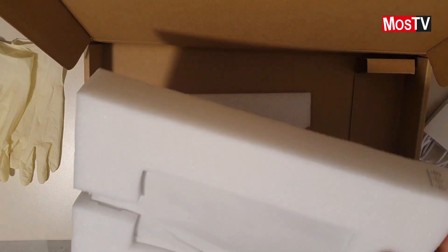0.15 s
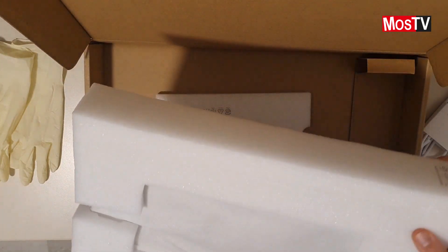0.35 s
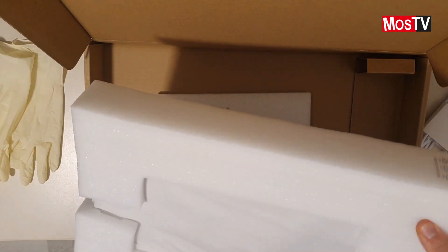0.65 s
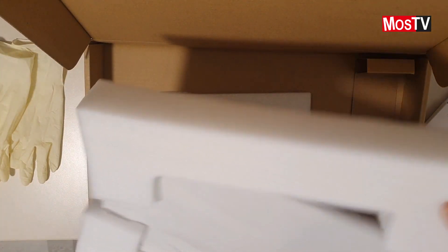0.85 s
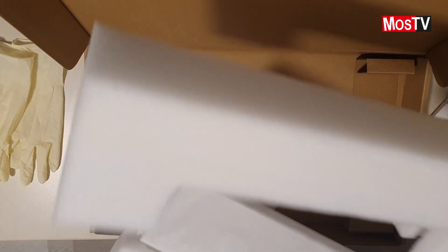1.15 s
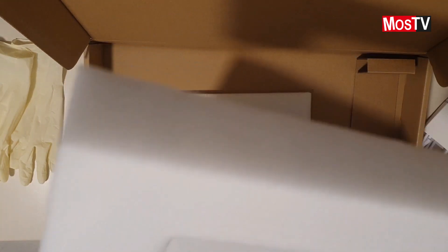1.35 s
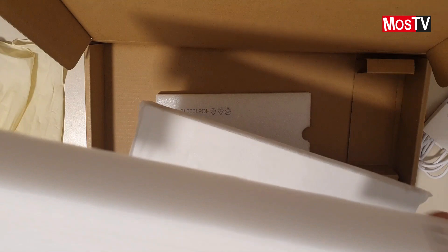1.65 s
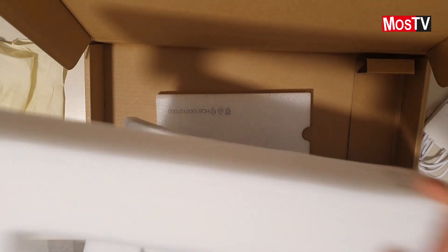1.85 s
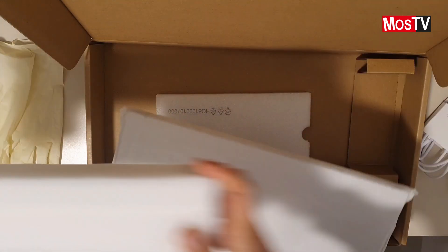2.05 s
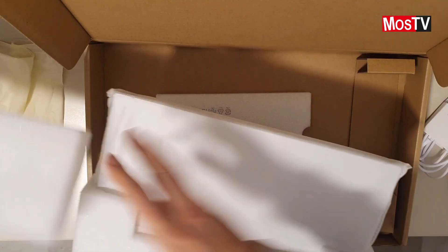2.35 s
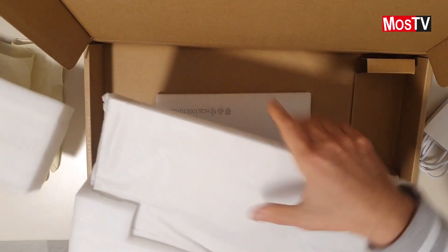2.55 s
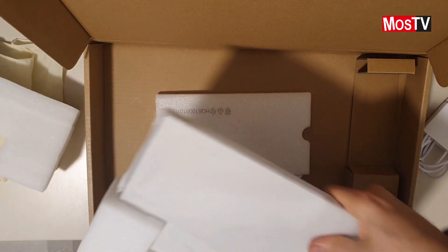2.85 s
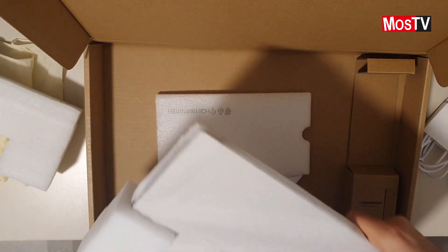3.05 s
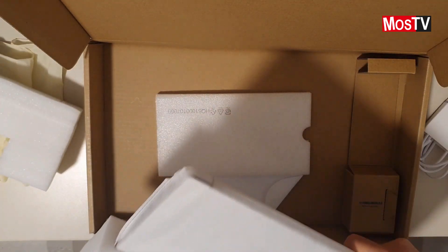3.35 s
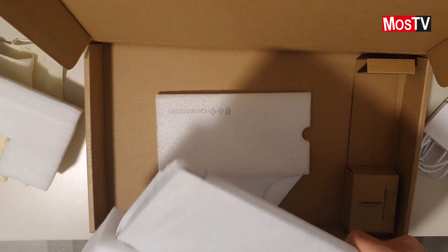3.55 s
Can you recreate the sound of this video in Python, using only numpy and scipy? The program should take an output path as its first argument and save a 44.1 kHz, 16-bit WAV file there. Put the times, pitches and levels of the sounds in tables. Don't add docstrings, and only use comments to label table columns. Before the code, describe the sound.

Foam rasps on cardboard from the start, swelling to its loudest near 0.4 s, easing at 0.6, then a brighter quick pull at 0.8-0.9. A soft dull slide fades around 1.0-1.3, leaving near quiet. Fingers brush lightly at 2.2; at 2.4 the block lands with a sharp woody thump and low table boom. Small bounces follow until 3.0, with faint wrap rustles, clearer at 3.45 and 3.7, over quiet room hum.

```python
import sys
import numpy as np
from scipy import signal
from scipy.fft import rfft, irfft, next_fast_len
from scipy.io import wavfile
from scipy.ndimage import uniform_filter1d, map_coordinates

SR = 44100
rng = np.random.default_rng(int(sys.argv[2]) if len(sys.argv) > 2 else 0)


def master_out(mix):
    frames = np.transpose(np.atleast_2d(mix))
    ceiling = np.clip(frames, -1, 1)
    pcm = np.round(ceiling * 32767).astype(np.int16)
    wavfile.write(sys.argv[1], SR, pcm)


def voltage_ratio(decibels):
    exponent = np.asarray(decibels, float) / 20
    return 10 ** exponent


N = 163170

# (frequency [Hz], density [dB per Hz])
RUB_COLOUR = [(410, -31.5), (700, -10), (921, 4), (1010, 0), (4400, -5.5), (6770, -12), (8020, -16.5),
              (11100, -18), (15800, -21.5)]


def unit(x):
    return x / np.sqrt(np.mean(x ** 2) + 1e-20)


def along(points, hz):
    f, v = np.transpose(points)
    return np.interp(np.log(hz + 1), np.log(f + 1), v)


def wobble(rate):
    return map_coordinates(rng.standard_normal(400), [np.arange(N) * min(rate, 90) / SR])


def filtered(x, response):
    m = next_fast_len(x.shape[-1] + 8192)
    spectrum = rfft(x, m) * response(np.fft.rfftfreq(m, 1 / SR))
    return irfft(spectrum, m)[..., :x.shape[-1]]


def closed(points, hz):
    (low_hz, low_db), (high_hz, high_db) = points[0], points[-1]
    return voltage_ratio(along([(low_hz / 3, low_db - 40)] + list(points) + [(high_hz * 2, high_db - 40)], hz))


def spread(pair, gain):
    # (frequency [Hz], correlation [-1 to 1])
    likeness = [(60, 0.67), (300, .86), (640, .6), (1400, -0.013), (3100, -0.047), (7000, 0.083)]

    def mid_side(hz):
        turn = np.arccos(np.clip(along(likeness, hz), -1, 1)) / 2
        return gain(hz) * np.array([np.cos(turn), np.sin(turn)])

    mid, side = filtered(pair, mid_side)
    return unit(np.array([mid + side, mid - side]))


def patchy(pair, patchy_db):
    z = signal.stft(pair, nperseg=512)[2]
    field = uniform_filter1d(rng.standard_normal(z.shape[1:]), size=3, axis=0)
    field = uniform_filter1d(field, size=5, axis=1)
    return signal.istft(z * voltage_ratio(patchy_db * unit(field)), nperseg=512)[1][:, :N]


def slips():
    slips_per_s, slip_db, smooth = 5000, 3, 1.35
    when, size = rng.random((2, N)), rng.exponential(size=(2, N))
    hiss = rng.standard_normal((2, N))
    jerks = (when < slips_per_s / SR) * np.sign(hiss) * voltage_ratio(slip_db * np.minimum(size, 4))
    return unit(jerks) + smooth * hiss


def panels(hz):
    # (centre [Hz], width [Hz], lift or, if negative, cut [dB])
    resonances = [(937, 300, -3.5), (1330, 150, 0.5), (2470, 61, 0), (6600, 1300, 3)]
    return voltage_ratio(sum(db / (1 + (2 * (hz - c) / w) ** 2) for c, w, db in resonances))


def strokes(rows, colour, patchy_db):
    # (frequency [Hz], density [dB per Hz])
    thrum = [(120, -14), (210, -16), (380, -4), (575, -7), (920, -6), (1150, -12.5)]
    edge_db, body_db = 24, -9.5
    t, rasp, body = np.arange(N) / SR, np.zeros(N), np.zeros(N)
    for s, rise, fall, db, low_db in rows:
        from_peak = (t - s) / np.where(t < s, rise, fall)
        press = voltage_ratio(2 * (db - edge_db * from_peak ** 2))
        rasp += press
        body += press * voltage_ratio(2 * (low_db + body_db))
    high = spread(patchy(slips(), patchy_db), lambda hz: closed(colour, hz) * panels(hz))
    low = spread(patchy(slips(), patchy_db), lambda hz: closed(thrum, hz))
    high = voltage_ratio(0.5 * wobble(35.9)) * np.sqrt(rasp) * high
    return high + voltage_ratio(0.59 * wobble(45)) * np.sqrt(body) * low


def room_tone():
    # (frequency [Hz], density [dB per Hz])
    hush_colour = [(150, -5.5), (330, -20), (700, -23), (1080, -9.5), (1330, -19.5), (2500, -27.5),
                   (6500, -30.5), (13000, -39)]
    # (frequency [Hz], density [dB per Hz])
    drone_colour = [(30, -21.5), (48, 0), (65, -11.5), (90, -5.5), (120, -21), (250, -28)]
    hush_db, hush_top_hz, drone_db = -74, 12800, -67.5
    hush = patchy(rng.standard_normal((2, N)), 1.5)
    hush = spread(hush, lambda hz: closed(hush_colour, hz) * (hz < hush_top_hz))
    drone = spread(rng.standard_normal((2, N)), lambda hz: closed(drone_colour, hz))
    return voltage_ratio(hush_db) * hush + voltage_ratio(drone_db + 0.7 * wobble(5)) * drone


def cardboard_rubs():
    # (time of peak [s], rise [s], fall [s], level [dB], low body [dB])
    rubs = [
        (0.0, .05, 0.15, -48.5, -2.5),
        (.14, 0.082, 0.31, -36, 1.5),
        (.21, 0.15, 0.078, -31, -6.5),
        (.37, 0.1, 0.081, -27, -4.5),
        (.61, 0.086, 0.095, -52, 8),
    ]
    return strokes(rubs, RUB_COLOUR, patchy_db=1.36)


def table():
    # (time [s], level [dB], mode [Hz], t60 [s])
    shoves = [(0.091, -45.5, 100, 0.66), (.2, -44, 49.7, 0.29), (0.328, -56, 90, 0.39),
              (0.591, -57.5, 92.8, .3), (0.779, -47.5, 80, 0.37), (0.901, -50, 51.4, 0.81),
              (1.131, -45.5, 92.3, 0.36), (2.15, -55.5, 50.8, 0.84), (2.238, -40.5, 77.6, 0.13),
              (2.319, -48, 88.5, 0.23), (2.409, -23, 121, 0.13), (2.75, -35.5, 148, 0.1),
              (2.761, -37, 88.5, 0.57), (2.6, -48.5, 48.2, 1.2), (2.426, -31, 61, 0.49),
              (2.535, -35, 230, 0.11), (2.17, -60, 119, .2), (1.33, -63.5, 200, 0.22),
              (2.868, -41.5, 88.7, .5), (3.021, -44, 90.2, 0.29), (3.08, -47.5, 89.3, 0.53),
              (3.58, -54, 92, 0.4)]
    # (mode [Hz], level [dB], t60 [s], phase [rad])
    boom_modes = [(89.5, -1.5, .5, np.pi), (104.5, 0, .42, 0)]
    thump_s, thump_db, shove_s, lag = 2.4478, -20.5, 0.008, 20
    out, t = np.zeros(N + SR), np.arange(SR // 2) / SR
    soft = 1 - np.exp(-t / shove_s)
    for s, db, hz, t60 in shoves:
        out[round(s * SR):][:len(t)] += soft * voltage_ratio(db - 60 * t / t60) * np.sin(2 * np.pi * hz * t)
    boom = sum(voltage_ratio(db - 60 * t / t60) * np.sin(2 * np.pi * hz * t + phase) for hz, db, t60, phase in boom_modes)
    out[round(thump_s * SR):][:len(t)] += voltage_ratio(thump_db) * soft * boom
    return np.array([out[:N], np.roll(out, lag)[:N]]) * voltage_ratio([[-0.6], [0.6]])


def pull_out():
    # (time of peak [s], rise [s], fall [s], level [dB], low body [dB])
    pulls = [
        (.775, 0.041, 0.027, -36, 1),
        (.81, 0.063, 0.08, -26, -6.5),
        (.89, 0.099, 0.073, -27.5, 1.5),
    ]
    tilt_db = 1
    brighter = [(hz, db + tilt_db * np.log2(hz / 2000)) for hz, db in RUB_COLOUR]
    return strokes(pulls, brighter, patchy_db=1.4)


def foam_slides():
    # (time of peak [s], rise [s], fall [s], level [dB], low body [dB])
    slides = [
        (1.15, 0.27, 0.16, -53, 6),
        (1.26, 0.13, 0.027, -64, -7),
        (1.4, 0.45, 0.19, -74.5, -9),
        (1.51, 0.17, 0.079, -70, 3),
        (1.72, 0.03, 0.062, -76.5, 8),
        (1.8, 0.052, 0.066, -70, -8),
        (1.92, 0.029, 0.056, -80, 2.5),
    ]
    # (frequency [Hz], density [dB per Hz])
    slide_colour = [(1200, -20), (1950, -18.5), (2600, -13), (2950, -9.5), (3400, -10), (5300, -14.5),
                    (8400, -25), (12500, -28)]
    return strokes(slides, slide_colour, patchy_db=-1.2)


def hollows():
    # (start [s], end [s], from [Hz], to [Hz], level [dB])
    glides = [(1.02, 1.245, 400, 390, -62.5), (1.03, 1.24, 2700, 3100, -60),
              (1.18, 1.31, 3300, 3600, -67.5), (1.28, 1.56, 3500, 4000, -76), (2.12, 2.21, 1300, 1200, -66),
              (2.24, 2.325, 1250, 1080, -58.5), (2.33, 2.37, 900, 950, -70), (2.32, 2.36, 430, 380, -68.5),
              (2.36, 2.41, 3100, 2650, -73), (1.76, 1.84, 3300, 3800, -73), (3.42, 3.49, 730, 900, -57.5),
              (3.65, 3.697, 900, 950, -51.5), (3.66, 3.695, 2000, 2700, -57), (2.32, 2.36, 4900, 4900, -74)]
    q, tone, tone_top_hz = 8, 0.7, 1500
    out = np.zeros((2, N + SR))
    for s, end, from_hz, to_hz, db in glides:
        u = np.linspace(0, 1, round((end - s) * SR))
        slow = filtered(rng.standard_normal((2, 2, SR // 2)), lambda hz: 1 / (1 + (2 * q * hz / from_hz) ** 2))
        slow = slow[..., :len(u)]
        turn = 2 * np.pi * np.cumsum(from_hz + (to_hz - from_hz) * u) / SR
        steady = tone * (from_hz < tone_top_hz)
        song = unit((unit(slow[0]) + steady) * np.cos(turn) + unit(slow[1]) * np.sin(turn))
        swell = np.sqrt(np.sin(np.pi * u).clip(0))
        out[:, round(s * SR):][:, :len(u)] += voltage_ratio(db) * swell * song
    return out[:, :N]


def finger_brushes():
    # (time of peak [s], rise [s], fall [s], level [dB], low body [dB])
    brushes = [
        (2.17, 0.047, 0.055, -55, -0.5),
        (2.243, 0.0071, 0.071, -48.5, -9.5),
        (2.29, 0.044, 0.06, -57.5, -12),
    ]
    # (frequency [Hz], density [dB per Hz])
    brush_colour = [(600, -18.5), (1150, -0.5), (1500, -5), (4200, -5), (7000, -13.5), (15800, -20)]
    return strokes(brushes, brush_colour, patchy_db=1.5)


def ticks():
    # (time [s], level [dB], pan to the left [dB])
    cracks = [
        (2.2405, -52, 3),
        (2.409, -48, 3),
        (2.423, -26.5, 4.5),
        (2.4305, -36, 4),
        (2.7495, -52, 3),
        (2.7992, -53, 0),
        (2.966, -56, 0),
    ]
    # (frequency [Hz], density [dB])
    crack_colour = [(1500, -3), (3000, 0.5), (7000, -1), (11000, -5), (15000, -12)]
    t60_s = 0.011
    out, t = np.zeros((2, N + SR)), np.arange(SR // 40) / SR
    for s, db, pan_db in cracks:
        crack = spread(rng.standard_normal((2, len(t))), lambda hz: closed(crack_colour, hz))
        crack = crack * voltage_ratio(db - 60 * t / t60_s)
        out[:, round(s * SR):][:, :len(t)] += crack * voltage_ratio([[pan_db], [-pan_db]])
    return out[:, :N]


def room(x):
    # (frequency [Hz], t60 [s])
    decay = [(100, 0.6), (500, 0.23), (2000, 0.38), (10000, 0.33)]
    noise = spread(rng.standard_normal((2, SR // 2)), lambda hz: 1 + 0 * hz)
    hz, t, z = signal.stft(noise, SR, nperseg=256)
    tail = signal.istft(z * voltage_ratio(-60 * t / along(decay, hz)[:, None]), SR, nperseg=256)[1]
    delayed = np.pad(x, ((0, 0), (250, 0)))
    return signal.fftconvolve(delayed, tail / np.linalg.norm(tail[0]), axes=1)


def blows():
    # (time [s], level [dB], brightness [dB per octave], knock [Hz])
    landings = [(2.407, -40.5, 2, 170), (2.4216, -16.5, -.5, 700), (2.429, -27, 2.5, 570),
                (2.4346, -27.5, -1, 637), (2.441, -30.5, 1.5, 864), (2.456, -33, -2, 540),
                (2.540, -38, 1, 650), (2.581, -42, -2.5, 790), (2.748, -41, -3, 550), (2.5, -56, 1, 1050),
                (2.938, -60, 1, 1426), (2.796, -51.5, -4, 210), (2.760, -48, 1.5, 386),
                (2.5, -56.5, 6, 640), (2.8755, -43, -1.5, 530), (2.890, -56, -5, 500),
                (3.014, -55.5, -12.5, 408), (2.379, -60, -1, 885), (3.529, -56, 0, 540),
                (3.595, -55, 0, 990), (2.472, -36.5, -1, 900), (2.98, -58.5, 1, 600), (3.034, -56, 1, 790)]
    # (mode [Hz], level [dB], t60 [s])
    block_modes = [(186.6, -9.5, 0.13), (288.6, -5, 0.08), (420, -11.5, 0.09), (500, -8.5, 0.07),
                   (648.7, -2, 0.09), (804, -5.5, .08), (953, -6, 0.09), (1151, -8, 0.08),
                   (1314, -10, 0.076), (1960, -15, 0.048), (2210, -20, 0.09), (3220, -21.5, 0.033)]
    # (frequency [Hz], density [dB])
    puff_colour = [(150, -5.5), (600, 0), (1300, -5), (2500, -10), (5000, -19), (8000, -27), (12000, -31),
                   (14800, -40)]
    knock_db, knock_t60_s, puff_db, puff_t60_s = 20, 0.013, 2.5, 0.087
    contact_s, ring_build_s, mode_scatter_db = 0.0018, 0.008, 1.5
    lag_s, pan_db = 0.00024, 0.27
    room_db, knock_room_db = -2.5, -5
    out, t = np.zeros((2, N + SR)), np.arange(SR // 8) / SR
    ears = np.maximum(t - [[0], [lag_s]], 0)
    contact = 1 - np.exp(-(t / contact_s) ** 2)
    for s, db, bright_db, knock_hz in landings:
        tilt = lambda hz: voltage_ratio(bright_db * np.log2(np.maximum(hz, 300) / 500))
        scatter = rng.normal(0, mode_scatter_db, (len(block_modes), 2, 1))
        turns = rng.random(len(block_modes))
        ring = sum(tilt(hz) * voltage_ratio(mode_db + r - 60 * t / t60) * np.sin(2 * np.pi * (hz * ears + u))
                   for (hz, mode_db, t60), r, u in zip(block_modes, scatter, turns))
        puff = spread(rng.standard_normal((2, len(t))), lambda hz: closed(puff_colour, hz) * tilt(hz))
        puff = puff * voltage_ratio(puff_db - 60 * t / puff_t60_s)
        knock = -voltage_ratio(knock_db - 60 * t / knock_t60_s) * np.sin(2 * np.pi * knock_hz * ears)
        push = voltage_ratio(db + np.array([[pan_db], [-pan_db]])) * contact
        rest = ring * (1 - np.exp(-t / ring_build_s)) + puff
        wet = voltage_ratio(room_db) * room(push * (voltage_ratio(knock_room_db) * knock + rest))
        at = round(s * SR)
        out[:, at:at + len(t)] += push * (knock + rest)
        out[:, at:at + wet.shape[1]] += wet
    return out[:, :N]


def wrap_shifts():
    # (time of peak [s], rise [s], fall [s], level [dB], low body [dB])
    shifts = [(2.73, 0.18, .1, -62, 5), (2.88, 0.11, 0.1, -51.5, -3), (2.95, 0.058, 0.067, -52, 4),
              (3.04, 0.11, 0.073, -55.5, 4.5), (3.15, 0.258, 0.2, -62.5, -1.5),
              (3.28, 0.084, 0.055, -59.5, -0.5), (3.38, 0.19, 0.11, -64, -8),
              (3.46, 0.041, 0.08, -46.5, -6.5), (3.53, 0.026, 0.042, -53, -7), (3.61, 0.083, 0.12, -62, -6),
              (3.685, 0.062, 0.055, -44.5, -1.5)]
    # (frequency [Hz], density [dB per Hz])
    shift_colour = [(550, -11.5), (950, -6), (2300, -9), (4000, -11.5), (7000, -20.5), (8500, -23),
                    (15800, -24.5)]
    return strokes(shifts, shift_colour, patchy_db=0.9)


def scene():
    foam = cardboard_rubs() + pull_out() + foam_slides() + hollows()
    foam = foam + finger_brushes() + ticks() + wrap_shifts()
    room_db = -11
    return room_tone() + foam + voltage_ratio(room_db) * room(foam)[:, :N] + table() + blows()


def roll_off(x):
    return signal.sosfilt(signal.butter(12, 16450, fs=SR, output="sos"), x)


def record(dry):
    notch_hz, notch_width_hz, notch_db = 8000, 780, -4.5
    top_hz, top_edge_hz = 15830, 80

    def microphone(hz):
        notch = voltage_ratio(notch_db / (1 + (2 * (hz - notch_hz) / notch_width_hz) ** 2))
        return notch * np.clip((top_hz - hz) / top_edge_hz, 0, 1)

    mix = filtered(dry, microphone)
    return roll_off(mix)


dry = scene()
out = record(dry)
master_out(out)
```